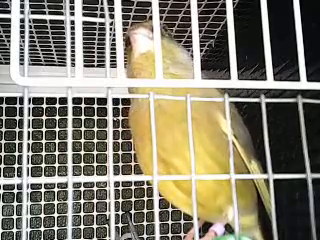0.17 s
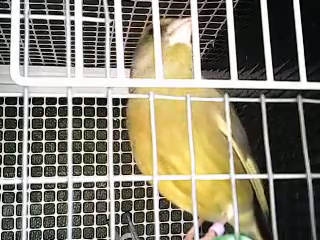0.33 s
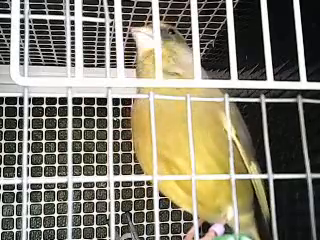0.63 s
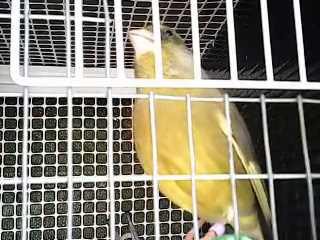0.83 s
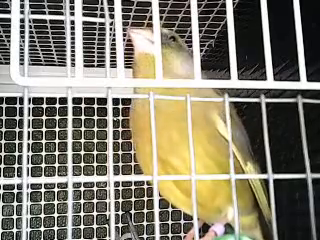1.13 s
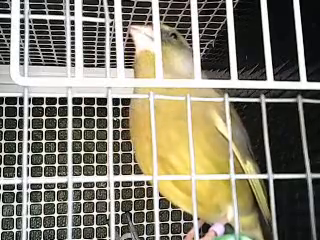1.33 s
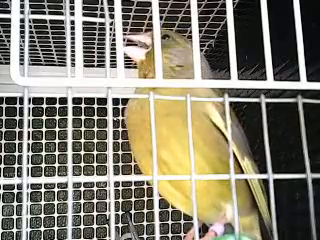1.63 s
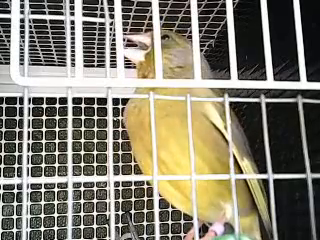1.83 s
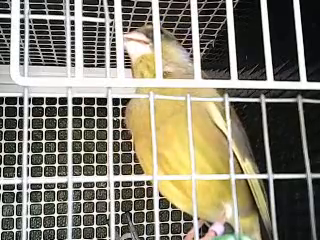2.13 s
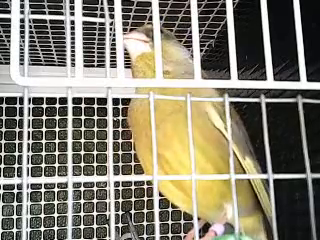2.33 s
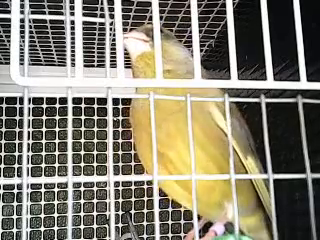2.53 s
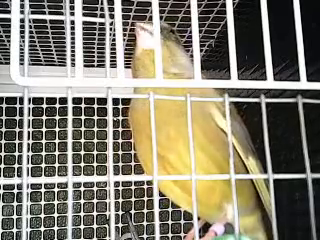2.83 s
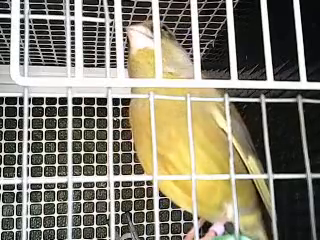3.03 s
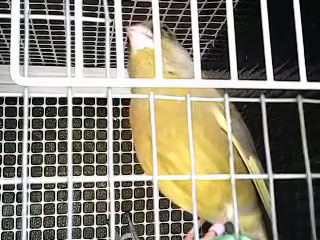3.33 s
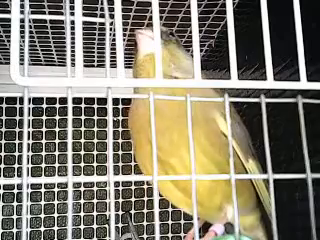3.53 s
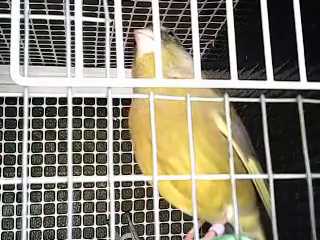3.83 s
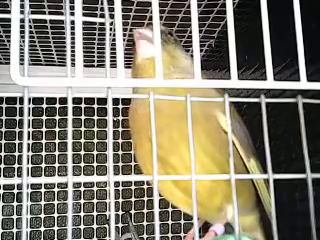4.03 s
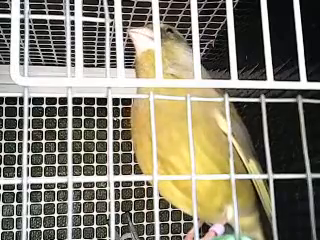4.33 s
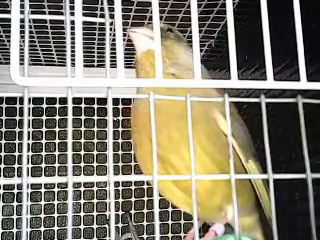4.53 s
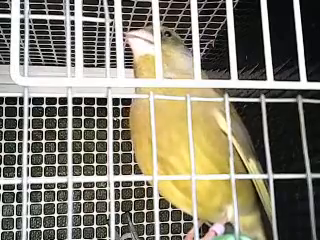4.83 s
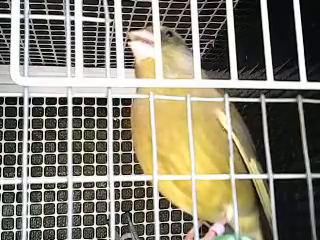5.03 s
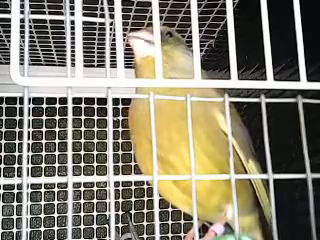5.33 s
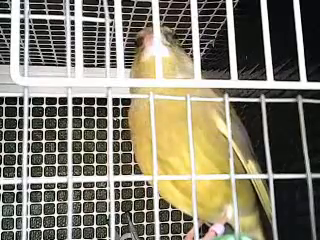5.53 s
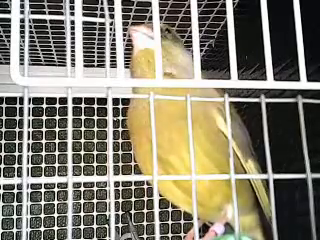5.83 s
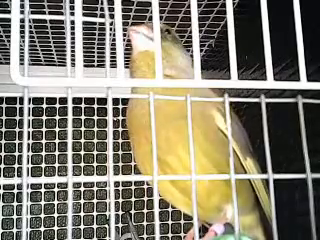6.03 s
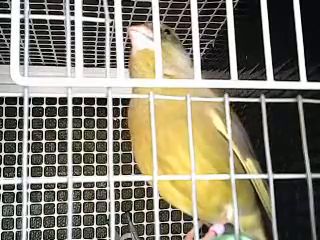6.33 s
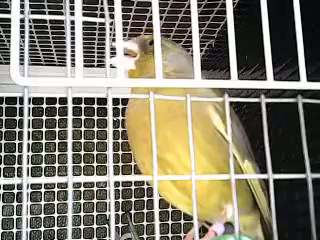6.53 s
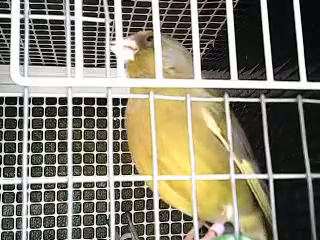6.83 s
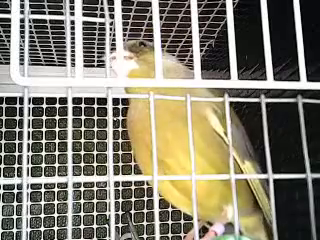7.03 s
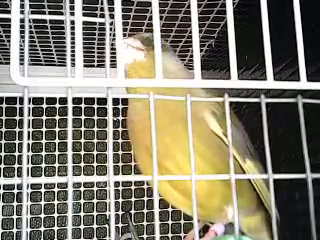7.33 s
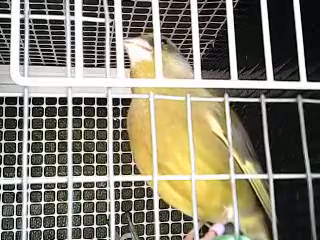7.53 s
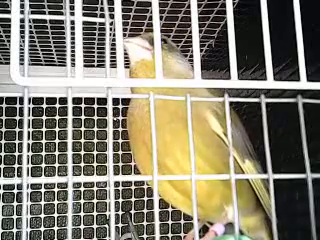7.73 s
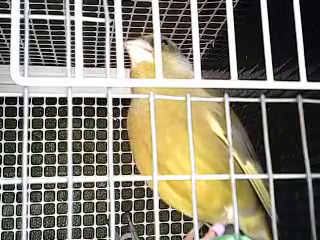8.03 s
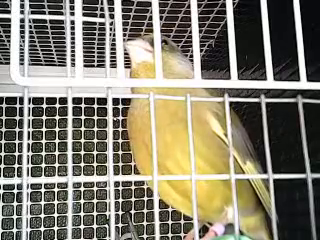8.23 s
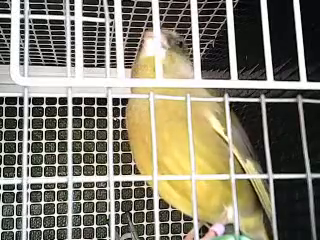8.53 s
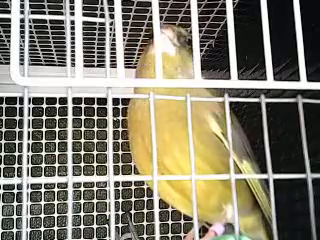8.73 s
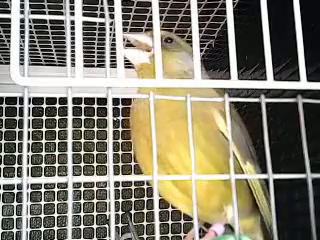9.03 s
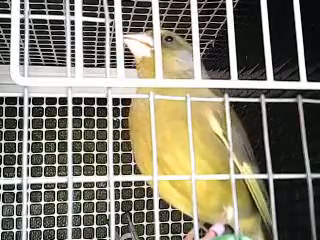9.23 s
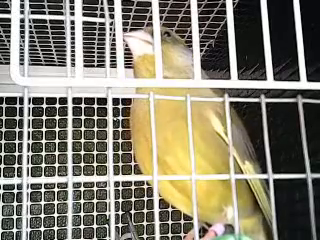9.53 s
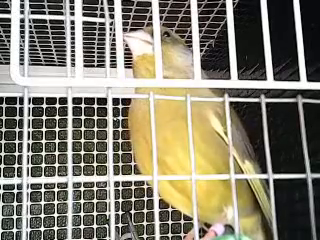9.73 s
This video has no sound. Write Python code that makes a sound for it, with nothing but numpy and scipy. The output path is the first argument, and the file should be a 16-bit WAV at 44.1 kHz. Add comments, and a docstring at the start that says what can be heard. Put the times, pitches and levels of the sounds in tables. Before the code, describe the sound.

An echoing room with several finches. The nearest bird is loud and piercing, its strongest notes slightly clipped: scattered chirps, a harsh nasal wheeze, five quick falling strokes, flurries of sliding notes, a rising whistle, then more rapid chirps with brief gaps. Softer birds chatter further off. Behind lie dull traffic rumble, a car, a heavier engine growing late, faint distant hoots and a high steady camera whine.

```python
"""An echoing room with traffic outside; a caged finch sings close to the microphone of a small camera.
Near: sliding chirps, one long buzzy wheeze and a rising whistle, all sines with a moving pitch.
Further off: other finches twitter through the room's noise tail, and faint tones hoot far outside.
Behind: filtered noise for the road, harmonics for two engines, and the camera's thin steady whine.
The camera clips the loudest notes flat."""
import sys
import numpy as np
from scipy import signal
from scipy.fft import rfft, irfft, next_fast_len
from scipy.io import wavfile
from scipy.ndimage import uniform_filter1d, map_coordinates

SR = 44100
rng = np.random.default_rng(int(sys.argv[2]) if len(sys.argv) > 2 else 0)


def transcribe(signal):
    """Save signal, clipped to [-1, 1], as a 16-bit WAV file at the path in sys.argv[1]."""
    frames = np.atleast_2d(signal).T
    limited = np.clip(frames, -1, 1)
    pcm = np.round(limited * 32767).astype(np.int16)
    wavfile.write(sys.argv[1], SR, pcm)


N = 436149

# All levels are relative: the mix, the room and random flutter come on top.
# outside, road noise over time: (t/s, level/dB)
ROAD_LEVEL = [(0, -35), (9.89, -31)]
# road rumble and hiss, spectrum shape: (f/Hz, density/dB)
ROAD_SPECTRUM = [(25, -1), (60, 1.5), (635, -5), (1000, -18), (2290, -31.5), (4400, -18.5), (7200, -34.5),
                 (7950, -18), (9000, -33), (15700, -31.5)]
# outside, two engines: (t/s, firing f/Hz, level/dB)
CAR_PASS = [(2.4, 36.05, -48), (3.0, 41.47, -43), (3.8, 46.5, -36), (4.2, 47.63, -38.5), (5.2, 56.9, -30.5),
            (5.5, 51.4, -41), (6.1, 40.9, -48)]
LORRY_PASS = [(4.0, 25.95, -52), (5.7, 30.04, -32), (6.5, 33.1, -37), (7.5, 35.47, -32),
              (8.8, 36.96, -24.5), (9.4, 36.7, -24.5), (9.55, 37.3, -29), (9.89, 37.64, -31)]
# strength of the multiples of each firing rate: (multiple, level/dB)
CAR_HARMONICS = [(1, -4), (2, 1), (4, -7.5), (5, -1.5), (6, -8.5)]
LORRY_HARMONICS = [(1, -10.5), (2, 3.5), (3, -11), (5, -5.5), (7, -12.5), (8, -12.5), (10, -13.5)]
# steady tones of the camera electronics: (f/Hz, level/dB)
WHINE_TONES = [(8000, -30.5), (15083, -47)]
FRAME_HZ, FIRST_GAP_S = 29.986, .0279  # picture rate, first pause
# faint hoots far away: (t/s, length/s, f/Hz, level/dB)
FAR_HOOTS = [(3.7, 0.055, 1200, -39), (3.986, 0.11, 1060, -35), (4.25, 0.15, 1003, -39),
             (4.544, .05, 1043, -35.5), (4.849, .15, 1030, -40.5), (6.45, 0.134, 1152, -41),
             (6.86, 0.091, 1156, -38.5), (8.682, 0.12, 1290, -45.5)]
# further off, blur of distant twitter: (t/s, level/dB)
TWITTER_LEVEL = [(0, -18), (.2, -30), (1.2, -26), (2.3, -24), (3.3, -28), (4.4, -25.5), (5.5, -27),
                 (6.5, -23.5), (7.4, -20), (7.8, -44), (8.3, -31), (9.3, -40.5), (9.89, -35)]
# further off, short calls of the other birds: (t/s, start f/Hz, end f/Hz, level/dB)
DISTANT_CALLS = [(0, 3900, 3000, -25), (.075, 4260, 4435, -27), (.08, 6000, 5700, -23),
                 (1.203, 3110, 2885, -22.5), (1.35, 4392, 4392, -21), (3.013, 6520, 6620, -26),
                 (3.138, 5469, 5460, -11.5), (3.217, 6400, 5986, -23), (3.287, 4360, 4296, -16),
                 (3.479, 5220, 5600, -17), (3.618, 4306, 4080, -20), (3.688, 4440, 4470, -23),
                 (3.785, 3900, 4050, -22), (3.83, 3930, 3940, -21), (4.164, 3789, 4100, -20),
                 (4.328, 3100, 2900, -27), (4.62, 4100, 4450, -19), (4.79, 3040, 5630, -17.5),
                 (4.974, 4230, 5400, -18), (5.161, 5570, 5565, -15.5), (5.462, 5740, 5430, -23),
                 (5.501, 3680, 3900, -20), (5.582, 5530, 5560, -16), (5.666, 3280, 5070, -25),
                 (5.942, 6060, 6000, -23), (6.26, 4270, 4040, -27), (6.279, 5990, 6020, -18.5),
                 (6.443, 3620, 5280, -22.5), (6.447, 4500, 4415, -21), (6.783, 3630, 5300, -19.5),
                 (6.922, 4250, 4330, -24), (9.225, 2865, 2885, -22.5), (7.7, 2850, 3000, -31),
                 (8.19, 3600, 4400, -33), (9.37, 4000, 4450, -31), (9.775, 3200, 3230, -26),
                 (5.9, 4450, 4480, -24), (5.76, 3100, 3700, -29)]
CALL_S = .027
# further off, drawn-out slides: (t/s, length/s, start f/Hz, end f/Hz, level/dB)
DISTANT_SLIDES = [(2.384, .063, 5081, 5081, -29), (2.378, .14, 4040, 4650, -24.5),
                  (2.502, .15, 4900, 5500, -29), (2.995, .39, 4050, 4580, -30.5),
                  (4.365, .062, 4460, 4500, -28.5), (4.439, .057, 2970, 3300, -26),
                  (5.24, .03, 2820, 4400, -23), (6.862, .074, 5320, 5050, -25),
                  (6.919, .1, 7620, 7420, -32), (7.78, .051, 4070, 5320, -34.5),
                  (8.037, .053, 4900, 5840, -35), (8.891, .06, 4000, 4600, -28),
                  (9.018, .14, 4850, 5540, -28.5)]
# resonances near the microphone: (f/Hz, width/Hz, level/dB)
MIC_CAVITY = [(2830, 330, 2), (4398, 187, 2), (5400, 270, -2.5), (5800, 390, -5.5), (6760, 830, -5)]
# first echoes off the walls: (delay/s, level/dB)
WALL_ECHOES = [(.0021, -8), (.0063, -7.5), (.011, -13.5), (.019, -20)]

# close, chirps that slide to a pitch and hold it: (t/s, slide/s, hold/s, start f/Hz, held f/Hz, level/dB)
SLIDING_CHIRPS = [(.454, .01, .021, 5600, 5450, -13.5), (.468, .013, .006, 3250, 3080, -6.5),
                  (.505, .016, .002, 5500, 4800, -20), (.93, .014, .001, 5500, 4700, -21),
                  (.493, .015, .002, 2930, 2680, -6), (.662, .019, .007, 3400, 2800, -5),
                  (.908, .014, .011, 3230, 2760, -5), (1.024, .019, .023, 4220, 4320, -20.5),
                  (1.087, .041, .003, 3830, 2790, -5), (3.357, .012, .008, 2700, 3330, -11.5),
                  (3.439, .008, .002, 4150, 4600, -1.5), (3.451, .017, .001, 4600, 4230, -1),
                  (3.47, .008, .004, 4250, 4520, -2), (3.574, .013, .006, 2700, 3180, -2),
                  (3.755, .007, .016, 2756, 2850, -4.5), (3.992, .009, .015, 2756, 3160, -5.5),
                  (4.073, .024, .001, 7062, 6700, -10), (4.098, .016, .001, 6700, 5500, -10),
                  (4.103, .012, .027, 2876, 4500, -4.5), (4.228, .014, .023, 2842, 3470, -6),
                  (4.58, .005, .005, 2700, 3100, -15), (4.596, .012, .008, 2950, 2740, -11),
                  (4.597, .012, .006, 3150, 3250, -7), (4.615, .005, .001, 3250, 3560, -6),
                  (4.621, .014, .001, 3520, 3200, -8), (4.839, .013, .012, 2750, 3640, -11),
                  (4.867, .04, .019, 3500, 4620, -6.5), (4.917, .004, .002, 5750, 5500, -12),
                  (4.925, .013, .001, 5560, 4950, -8), (4.94, .015, .037, 4750, 4330, -16),
                  (5.013, .009, .004, 4800, 7200, -7), (5.027, .029, .002, 7150, 6330, -9),
                  (5.058, .008, .016, 6400, 6800, -11), (5.298, .005, .024, 2900, 3690, -7.5),
                  (5.329, .014, .046, 3700, 4560, -5), (5.358, .008, .008, 5500, 5050, -17),
                  (5.878, .01, .001, 2350, 2550, -24), (5.891, .004, .006, 2620, 2760, -6),
                  (5.994, .016, .009, 2583, 3060, -3), (6.064, .009, .016, 3100, 3410, -8.5),
                  (6.913, .006, .001, 6000, 7300, -6.5), (7.021, .013, .001, 6300, 5020, -8.5),
                  (7.026, .012, .004, 4390, 4540, -12), (7.045, .02, .002, 4500, 4900, -17),
                  (7.036, .036, .002, 5020, 6160, -8.5), (7.14, .027, .002, 2700, 4550, -3),
                  (7.157, .012, .014, 4700, 5500, -7), (7.185, .005, .012, 4800, 4370, -8),
                  (7.26, .024, .02, 2780, 4500, -6), (7.288, .022, .001, 4750, 5950, -9),
                  (7.311, .008, .001, 5900, 5300, -12), (7.385, .027, .025, 2750, 4520, -5),
                  (7.397, .01, .04, 4400, 5520, -8), (7.438, .01, .002, 4500, 4350, -12),
                  (8.222, .05, .002, 4420, 4650, -24), (8.276, .08, .004, 4640, 4420, -22),
                  (8.452, .02, .013, 7900, 7860, -22.5), (8.5, .006, .001, 7300, 6200, -2),
                  (8.507, .013, .002, 6200, 5300, 4), (8.523, .016, .006, 5330, 5620, 0),
                  (8.641, .008, .001, 2830, 2970, -5), (8.651, .014, .012, 2950, 2800, -6),
                  (8.853, .006, .001, 3000, 3050, -20), (8.862, .008, .015, 3050, 2810, -6),
                  (8.969, .012, .002, 3600, 4400, -2), (8.985, .012, .003, 4350, 4180, -3),
                  (9.002, .006, .014, 4250, 4450, -6), (9.018, .022, .002, 5000, 7200, -17.5),
                  (9.045, .09, .02, 7350, 7275, -31), (9.076, .008, .004, 5400, 6400, -27),
                  (9.145, .02, .004, 7100, 5900, -4.5), (9.17, .016, .001, 5950, 6300, -4.5),
                  (9.188, .008, .006, 6250, 6000, -6), (9.486, .027, .003, 3240, 3340, -8),
                  (9.595, .02, .02, 2756, 3400, -7), (9.619, .004, .01, 2928, 2790, -11),
                  (9.71, .008, .002, 2800, 3400, -10), (9.721, .022, .002, 3350, 3050, -10),
                  (9.875, .009, .006, 2799, 2842, -23.5)]
# close, hollow notes sung on the octave over a faint fundamental:
# (t/s, slide/s, hold/s, fundamental start f/Hz, fundamental held f/Hz, octave level/dB)
HOLLOW_NOTES = [(.525, .018, .018, 2304, 1950, -7.5), (.707, .012, .035, 2090, 2210, -12),
                (.945, .016, .012, 2260, 2310, -18), (.978, .012, .003, 2290, 2170, -12.5)]
HOLLOW_OCTAVE_DB = 24  # octave over fundamental
# close, trill of falling strokes: (t/s, top f/Hz, low f/Hz, level/dB)
TRILL_STROKES = [(2.597, 3617, 2860, -4.5), (2.683, 3703, 3020, -3.5), (2.759, 4005, 2870, -5),
                 (2.836, 4048, 3040, -3.5), (2.91, 4220, 3050, -3)]
STROKE_FALL_S, STROKE_HOLD_S = .018, .007
# a high tick leads into each stroke after the first
TICK_LEAD_S, TICK_S, TICK_OVER_TOP, TICK_LOW_HZ = .013, .006, 1.62, 5200
TICK_DB, TICK_GROWS_DB = -10, 2.2  # first tick, gain from tick to tick
FADE_DB = 5  # a breath weakens towards its end
REBOUND = .1  # a held pitch creeps back by this share of its slide
SLUR_S, SLUR_SHARE = .005, .06  # how near in time and relative pitch two notes must be to join

# close, wheeze of quick down-sweeps: (t/s, level/dB, sweep top f/Hz, sweep low f/Hz), pitches nominal
WHEEZE_SWEEPS = [(1.445, -10, 4350, 3850), (1.55, -9, 4550, 4080), (1.65, -5, 4900, 3900),
                 (1.9, -2, 5300, 3990), (1.98, -1.5, 5250, 3680), (2.07, 1.5, 4700, 3050),
                 (2.14, -3.5, 4230, 2560), (2.25, -5, 3380, 2540), (2.308, -8, 3080, 2600)]
BASE_SWEEPS_PER_S, SWEEPS_PER_KHZ = 152, 24  # nominal rate; wider sweeps come faster
WHEEZE_EDGE_S, BROKEN_S = .012, .06  # gate softening; the wheeze stutters this long at either end

# close, octave of the whistle: (t/s, level/dB)
WHISTLE_OCTAVE = [(6.465, -48), (6.51, -24), (6.6, -21), (6.64, -8), (6.68, -7), (6.7, -14), (6.735, -45)]
WHISTLE_START_S, WHISTLE_END_S = 6.322, 6.779
# it scoops up from below, then climbs evenly
WHISTLE_END_HZ, CLIMB_HZ_PER_S, SCOOP_HZ, SCOOP_S = 2900, 1500, 950, .042
STEP_HZ, STEP_S = 230, .065  # the scoop climbs in steps, which die away from this size
WHISTLE_END_DB, GROWS_DB_PER_S = -2, 86
RAGGED_DB, RAGGED_S = 8, .08  # long notes start uneven and settle

CONVERTER_HZ, CLIP_LEVEL, TOP_HZ = 48000, .77, 15840  # converter rate, full scale, band limit


def amp(db):
    """Gain of a level in dB."""
    return 10 ** (np.asarray(db) / 20)


def unit(x):
    """x at rms 1."""
    return x / np.sqrt(np.mean(x ** 2) + 1e-20)


def curves(rows):
    """One value per sample for each column after the time, and a gate that is open inside the table."""
    s, *cols = np.transpose(rows)
    t = np.arange(N) / SR
    gate = uniform_filter1d(1. * (t > s[0]) * (t < s[-1]), size=200)
    return [np.interp(t, s, c) for c in cols] + [gate]


def wobble(rate):
    """A smooth random curve, rate knots a second."""
    knots = rng.standard_normal(int(N * rate / SR) + 4)
    return map_coordinates(knots, [np.arange(N) * rate / SR])


def filtered(x, response):
    """x times a response of frequency, which may be complex."""
    m = next_fast_len(N + SR // 2)
    return irfft(rfft(x, m) * response(np.fft.rfftfreq(m, 1 / SR)), m)[:N]


def tone(hz):
    """Phase of a sliding pitch."""
    return 2 * np.pi * np.cumsum(hz) / SR


def cavity(f):
    """Causal sum of the resonances near the microphone, with alternating signs."""
    total = 0
    for k, (centre, width, db) in enumerate(MIC_CAVITY):
        resonance = 1j * f * width / (centre * centre - f * f + 1j * f * width)
        total = total + (-1) ** k * amp(db) * resonance
    return total


def room(x, t60):
    """A diffuse noise tail, drawn anew for each quarter second, coloured by the cavity and thin below 2.5 kHz."""
    out, step, t = np.zeros(N + SR), SR // 4, np.arange(SR // 2) / SR
    for start in range(0, N, step):
        tail = rng.standard_normal(len(t)) * amp(-60 * t / t60) * (1 - np.exp(-t / 0.0014))
        wet = signal.fftconvolve(x[start:start + step], tail / np.linalg.norm(tail))
        out[start:start + len(wet)] += wet
    return filtered(out[:N], lambda f: cavity(f) / (1 + (2500 / (f + 1)) ** 12))


def roughness(catches, warble):
    """Complex gain of an unsteady voice: sudden phase slips (a second) with a dip, and a quick warble (radians)."""
    slips = np.cumsum((rng.random(N) < catches / SR) * rng.uniform(-np.pi, np.pi, N))
    # averaging across a slip makes the dip
    return uniform_filter1d(np.exp(1j * slips), size=40) * np.exp(1j * warble * wobble(260))


def add(out, s, length, shares, pitch_hz, db, edge, octave_db, rough):
    """Add one whistled note with soft ends and an octave; a rough voice warbles and catches."""
    u = np.linspace(-edge, length + edge, int((length + 2 * edge) * SR))
    first = max(round((s - edge) * SR), 0)
    place = out[first:][:len(u)]
    unsteady = rough[first:][:len(u)]
    u = u[:len(place)]
    phase = tone(np.interp(u / length, shares, pitch_hz)) + np.angle(unsteady)
    from_end = np.minimum(u + edge, length + edge - u)
    shape = np.sin(np.pi / 2 * np.clip(from_end / (3 * edge), 0, 1)) ** 2
    level = np.sqrt(2) * amp(np.interp(u / length, shares, db + np.zeros(len(shares))))
    voice = np.sin(phase) + amp(octave_db) * np.sin(2 * phase)
    place += level * shape * np.abs(unsteady) * voice


def engine(table, orders):
    """Firing rate and its multiples, each wavering in strength."""
    hz, level_db, gate = curves(table)
    phase = tone(hz + 0.3016 * wobble(3))
    harmonics = sum(amp(db + 3.0 * wobble(8)) * np.sin(k * phase) for k, db in orders)
    return gate * amp(level_db) * harmonics


def traffic():
    """Outside: road noise, patchy in time and frequency, and the harmonics of two engines."""
    z = signal.stft(rng.standard_normal(N), nperseg=1024)[2]
    patches = uniform_filter1d(rng.standard_normal(z.shape), size=4, axis=0)
    patches = uniform_filter1d(patches, size=6, axis=1)
    noise = signal.istft(z * amp(1.8 * unit(patches)), nperseg=1024)[1][:N]
    f, db = np.transpose(ROAD_SPECTRUM)
    road = unit(filtered(noise, lambda hz: amp(np.interp(np.log(hz + 1), np.log(f + 1), db))))
    engines = engine(CAR_PASS, CAR_HARMONICS) + engine(LORRY_PASS, LORRY_HARMONICS)
    return amp(curves(ROAD_LEVEL)[0] + 2.5) * road + engines


def whine():
    """Camera electronics: tones of fixed pitch that pause for a moment at every picture frame."""
    t = np.arange(N) / SR
    from_gap = np.abs(((t - FIRST_GAP_S) * FRAME_HZ + .5) % 1 - .5) / FRAME_HZ
    gate = np.clip(from_gap / 0.00095 - .2, 0, 1)
    tones = sum(np.sqrt(2) * amp(db + 1.2 * wobble(40)) * np.sin(2 * np.pi * hz * t)
                for hz, db in WHINE_TONES)
    return gate * tones


def hoots():
    """Far outside: short tones that sink slightly, blurred by phase slips and a quick warble."""
    out, rough = np.zeros(N), roughness(45, 1.2)
    for s, length, hz, db in FAR_HOOTS:
        add(out, s, length, [0, 1], [hz, .98 * hz], db, edge=0.0048, octave_db=-18.5, rough=rough)
    return out * amp(4.5 * wobble(35))


def neighbours():
    """Further off: sliding calls heard direct and through the room, and a random twitter from the room alone."""
    calls, blur, rough = np.zeros(N), np.zeros(N), roughness(20, .45)
    short_calls = [(s, CALL_S, *row) for s, *row in DISTANT_CALLS]
    for s, length, hz_a, hz_b, db in short_calls + DISTANT_SLIDES:
        knee_hz = hz_a + .7 * (hz_b - hz_a)  # the slide is quick at first, then levels off
        add(calls, s, length, [0, .4, 1], [hz_a, knee_hz, hz_b], db,
            edge=0.0024, octave_db=-33, rough=rough)
    for s, height, slide, size in rng.random((520, 4)):
        hz = 2900 + 3300 * height ** 1.5
        end_hz = np.clip(hz + 2600 * (slide - .35), 2750, 6600)
        add(blur, s * N / SR, .03, [0, 1], [hz, end_hz], -11 * size,
            edge=.004, octave_db=-30, rough=rough)
    calls *= amp(2.5 * wobble(120))
    heard = amp(-2) * calls + room(calls, t60=.4)
    return heard + amp(curves(TWITTER_LEVEL)[0]) * unit(room(blur, t60=0.6))


def slurred(notes):
    """Notes that start where another ends, in time and pitch, join into one breath: ((s, Hz, dB) points, octave dB)."""
    breaths = []
    for s, slide, hold, hz_a, hz_b, db, octave_db in sorted(notes):
        slide, hold = slide + 1e-4, hold + 1e-4  # never zero
        rebound_hz = hz_b + REBOUND * (hz_a - hz_b)
        points = [(s, hz_a, db), (s + slide, hz_b, db), (s + slide + hold, rebound_hz, db)]
        open_ends = [b for b, _ in breaths
                     if abs(b[-1][0] - s) < SLUR_S and abs(b[-1][1] / hz_a - 1) < SLUR_SHARE]
        if open_ends:
            open_ends[0][:] = [p for p in open_ends[0] if p[0] < s] + points
        else:
            breaths.append((points, octave_db))
    return breaths


def chirps():
    """Close: the singer's short sliding notes, slurred into breaths, their strength fluttering a little."""
    out, rough = np.zeros(N), roughness(30, .55)
    strokes = [(s, STROKE_FALL_S, STROKE_HOLD_S, hz, low_hz, db) for s, hz, low_hz, db in TRILL_STROKES]
    ticks = [(s - TICK_LEAD_S, TICK_S, 0, TICK_OVER_TOP * hz, TICK_LOW_HZ, TICK_DB + TICK_GROWS_DB * k)
             for k, (s, hz, *_) in enumerate(TRILL_STROKES[1:])]
    notes = [(*row, -35) for row in SLIDING_CHIRPS + strokes + ticks]  # weak octave
    notes += [(*row, db - HOLLOW_OCTAVE_DB, HOLLOW_OCTAVE_DB) for *row, db in HOLLOW_NOTES]
    for points, octave_db in slurred(notes):
        s, pitch_hz, db = np.transpose(points)
        db[-1] -= FADE_DB
        length = s[-1] - s[0]
        add(out, s[0], length, (s - s[0]) / length, pitch_hz, db,
            edge=.0033, octave_db=octave_db, rough=rough)
    return out * amp(1.8 * wobble(150))


def ragged(start_s, rate):
    """Level stumbles in dB that settle after the start of a long note."""
    return RAGGED_DB * np.exp(-np.abs(np.arange(N) / SR - start_s) / RAGGED_S) * wobble(rate)


def wheeze():
    """Close: the syrinx drops in pitch within every puff, lingering at top and bottom, so the train buzzes."""
    level_db, top_hz, low_hz, gate = curves(WHEEZE_SWEEPS)
    level_db = level_db + ragged(WHEEZE_SWEEPS[0][0], rate=130)
    gate = uniform_filter1d(gate, size=round(WHEEZE_EDGE_S * SR))
    centre_hz, span_hz = (top_hz + low_hz) / 2, top_hz - low_hz
    t = np.arange(N) / SR
    # at both ends the puffs slow down and narrow
    broken = sum(np.exp(-((t - row[0]) / BROKEN_S) ** 2) for row in (WHEEZE_SWEEPS[0], WHEEZE_SWEEPS[-1]))
    sweep_rate = BASE_SWEEPS_PER_S + SWEEPS_PER_KHZ * span_hz / 1000
    cycles = np.cumsum(sweep_rate * (1 - .2 * broken + .06 * wobble(90))) / SR
    within, odd = cycles % 1, (-1) ** np.floor(cycles)
    # every second puff starts a little higher
    fall = .5 * np.cos(np.pi * within ** .85) + .08 * odd * (1 - within)
    pitch_hz = centre_hz + span_hz * fall + 35 * wobble(250)
    puff = np.sin(np.pi * within) ** (.7 + 3 * broken) * amp(1.0 * wobble(170))
    voice = puff * np.sin(tone(pitch_hz))
    voice = 0.22 * voice + 1.3 * filtered(voice, cavity)
    voice = filtered(voice, lambda f: 1 / (1 + (2570 / (f + 1)) ** 12))  # low cut
    return amp(level_db + 2.5) * gate * voice


def whistle():
    """Close: a long rising note whose octave comes and goes as the beak opens, with faint higher partials."""
    left, gate = curves([(WHISTLE_START_S, WHISTLE_END_S - WHISTLE_START_S), (WHISTLE_END_S, 0)])
    since = left[0] - left  # seconds sung; left is seconds to go
    hz = WHISTLE_END_HZ - CLIMB_HZ_PER_S * left - SCOOP_HZ * np.exp(-since / SCOOP_S)
    level_db = WHISTLE_END_DB - GROWS_DB_PER_S * left + ragged(WHISTLE_START_S, rate=60)
    octave_db = curves(WHISTLE_OCTAVE)[0]
    steps_hz = STEP_HZ * np.sin(2 * np.pi * since / STEP_S) ** 3 * np.exp(-since / RAGGED_S)
    phase = tone(hz + 18 * wobble(60) + steps_hz)
    partials = sum(amp(-26 - 3.3 * k) * np.sin((k + 3) * phase) for k in range(3))
    voice = amp(level_db) * (np.sin(phase) + partials) + amp(octave_db) * np.sin(2 * phase)
    return np.sqrt(2) * gate * voice


def scene():
    """The close singer with wall echoes and room, over traffic, whine, hoots and neighbours."""
    background = traffic() + whine() + hoots() + neighbours()
    song = chirps() + wheeze() + whistle()
    echoes = sum(amp(db) * np.pad(song, (round(s * SR), 0))[:N] for s, db in WALL_ECHOES)
    near = amp(2.5) * (song + filtered(echoes, cavity)) + amp(-11.5) * room(song, t60=0.5)
    return (background + near)[None]


def record(dry):
    """The converter clips flat and its overtones fold back; nothing passes above the band limit."""
    seconds = N // SR + 1
    fine = signal.resample(np.pad(dry[0], (0, seconds * SR - N)), seconds * CONVERTER_HZ)
    clipped = np.clip(fine, -CLIP_LEVEL, CLIP_LEVEL)
    squashed = signal.resample(clipped, seconds * SR)[:N]
    power = uniform_filter1d(squashed ** 2, size=300)
    noise = filtered(rng.standard_normal(N), lambda hz: hz > 900)
    noisy = squashed + amp(-26) * power * noise  # faint broadband noise that follows the loudness
    return filtered(noisy, lambda hz: hz < TOP_HZ)[None]


dry = scene()
out = record(dry)
transcribe(out)
```